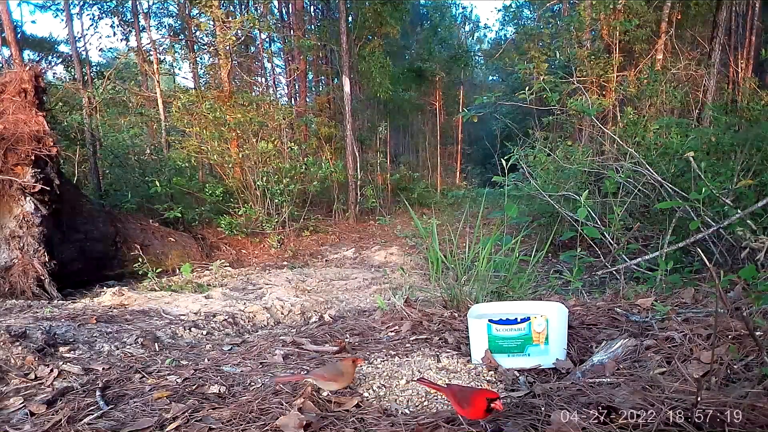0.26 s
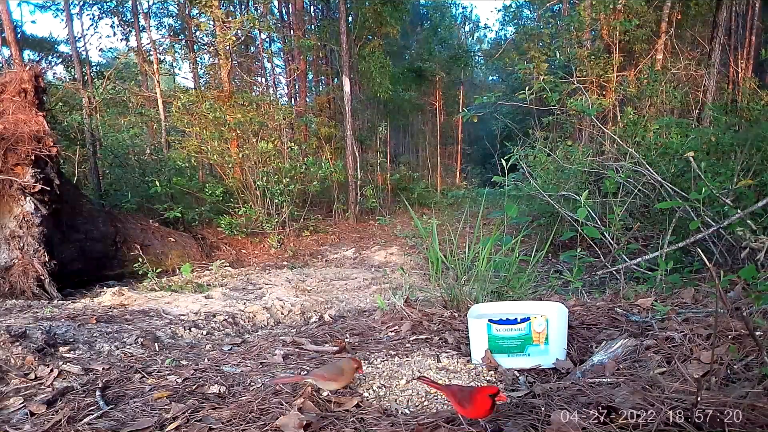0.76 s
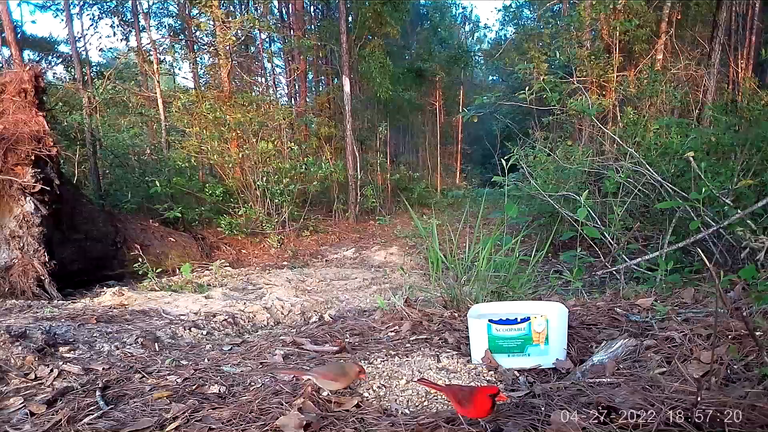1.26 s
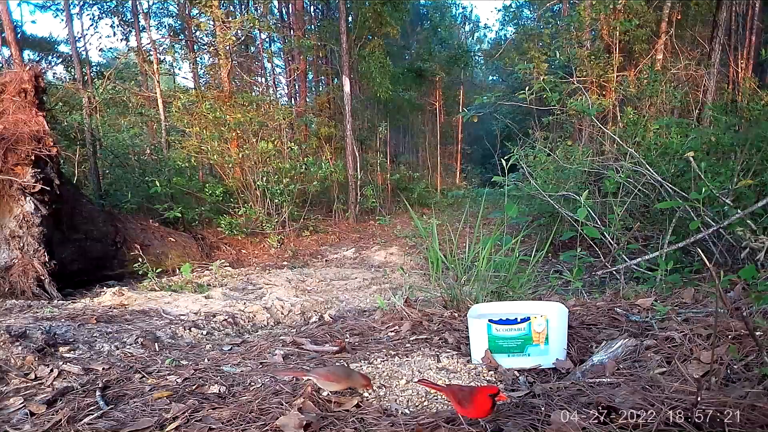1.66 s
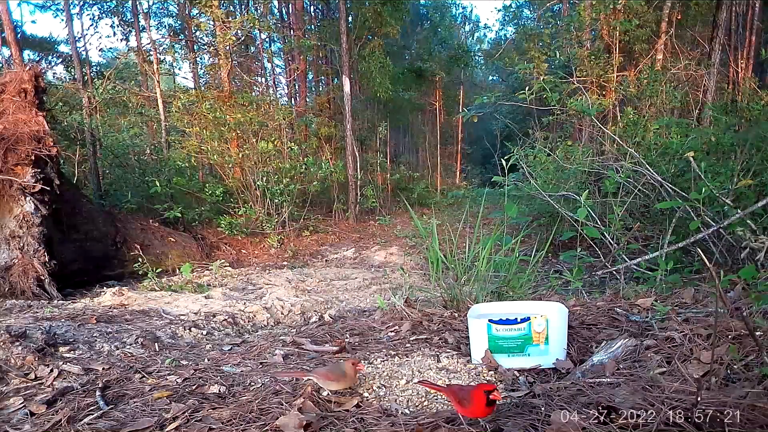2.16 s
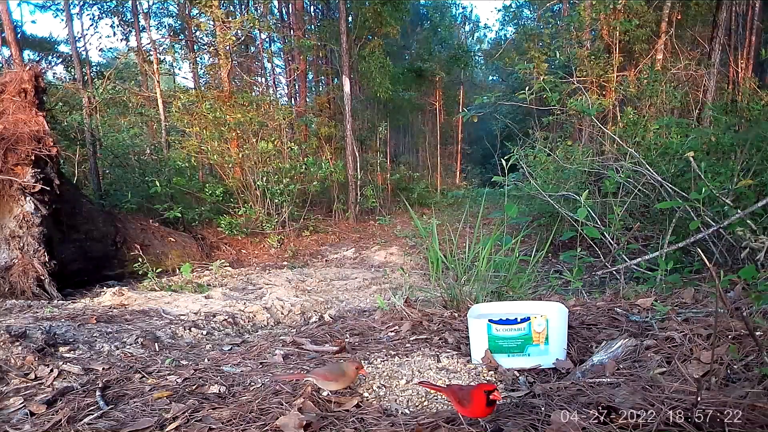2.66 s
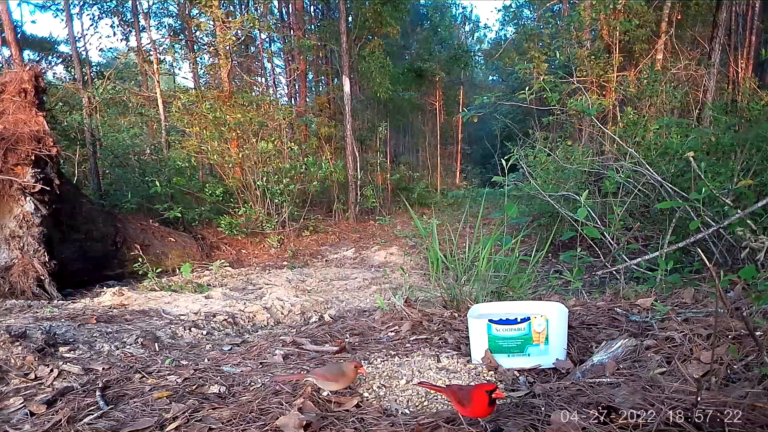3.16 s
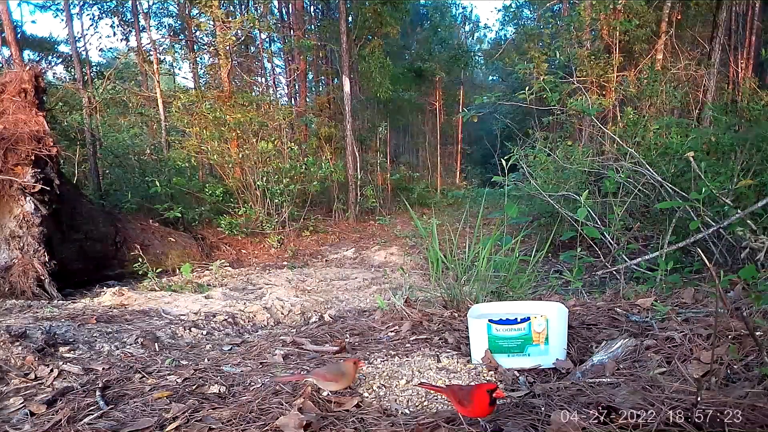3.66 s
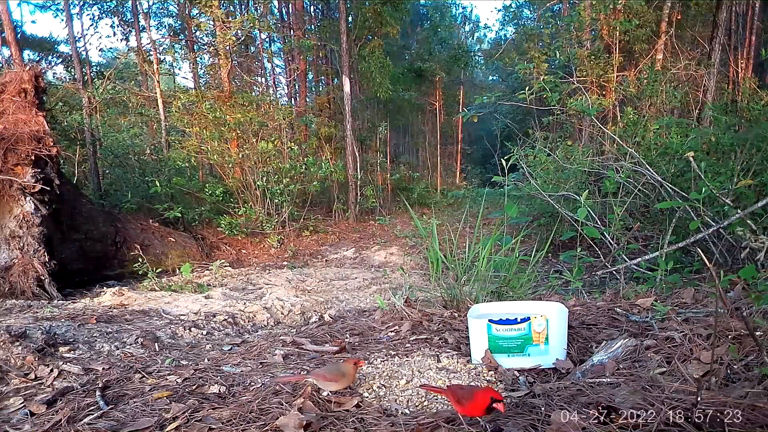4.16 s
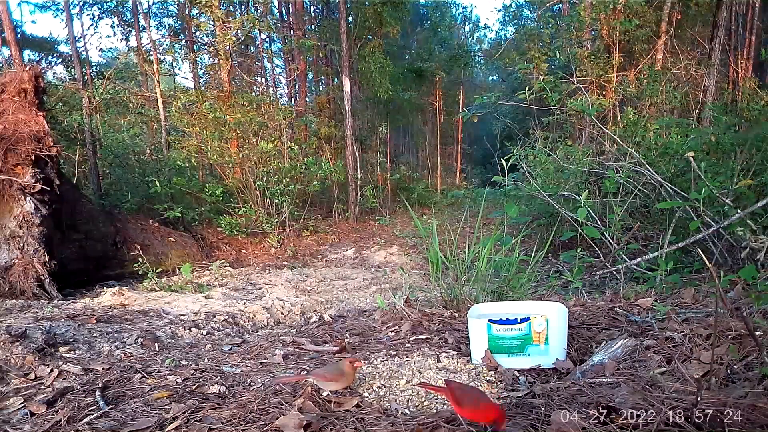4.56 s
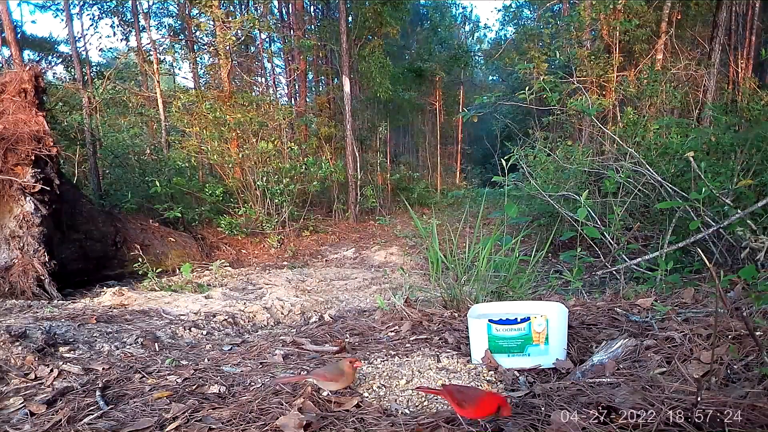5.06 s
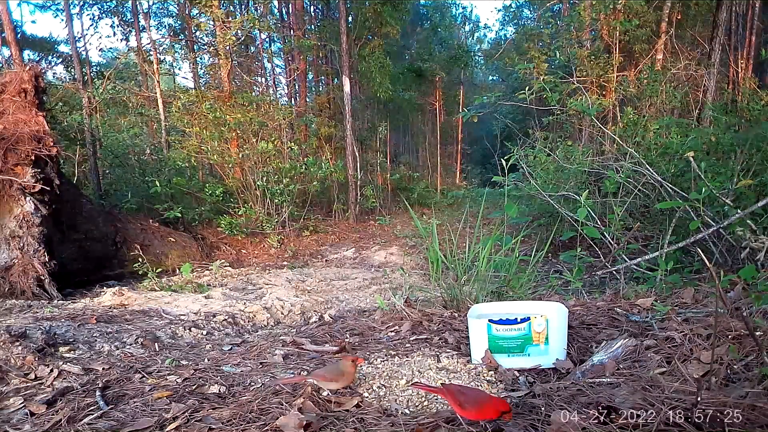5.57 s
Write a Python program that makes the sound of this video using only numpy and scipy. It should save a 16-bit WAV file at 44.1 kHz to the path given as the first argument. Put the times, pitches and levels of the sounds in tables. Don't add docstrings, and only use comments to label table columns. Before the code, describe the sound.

At a woodland clearing, a close cricket gives four fast, high trills over a continuous pulsing chorus of distant insects. Two birds crack seeds nearby: one sharp snap early, two very loud ones around two seconds, then many tiny ticks. Faint far bird whistles appear. The small mono camera microphone adds hiss, low hum and a thin electronic whine.

```python
import sys
import numpy as np
from scipy import signal
from scipy.fft import rfft, irfft
from scipy.io import wavfile

SR = 44100
rng = np.random.default_rng(int(sys.argv[2]) if len(sys.argv) > 2 else 0)


def attenuation_scalar(level_db):
    decades = np.asarray(level_db, float) / 20
    return 10 ** decades


def generate_wav(sig):
    pcm = np.round(np.clip(np.atleast_2d(sig).T, -1, 1) * 32767).astype(np.int16)
    wavfile.write(sys.argv[1], SR, pcm)


N = 256662
TIME_S = np.arange(N) / SR

# first full pulse t/s, pulse count, full level/dB
TRILLS = [
    (.1049, 35, -31.5),
    (1.7785, 39, -31.3),
    (3.3723, 40, -30),
    (5.0937, 36, -30.3),
]
# t/s, peak level/dB, low ring/dB, top ring/dB, deep ring/dB
CRACKS = [(.8303, -9, -6, -9, -26), (2.0651, 1.5, -20, -31, -42), (2.4904, 2.5, -23, -16, -35),
          (1.3783, -28, -4, -18, -26), (1.6526, -32, -14, -18, -26), (3.0147, -31, 2, -20, -16),
          (3.0524, -34, -14, -10, -7), (3.06, -27, 1, -20, -26), (3.097, -31, -18, -22, -26),
          (3.6147, -27, -2, -2, -30), (4.0004, -35, -12, -16, -26), (4.2063, -33, -8, -16, -26),
          (4.4834, -38, 0, -18, -26), (4.5984, -39, 0, -18, -26), (4.9312, -33, -10, -20, -26)]
# peak level/dB, low ring/dB, top ring/dB, deep ring/dB
NIBBLE_DB = (-36, -1, -20, -8)
# f/Hz, level/dB, t60/s
HUSK_MODES = [(2710, -4, 0.0058), (4300, -1, 0.005), (6100, -1.5, 0.0054), (6840, -3, .004),
              (7950, -2, 0.004), (9150, 1, 0.0032), (10700, 0, 0.0024), (11500, -2, 0.0021),
              (13700, -1, 0.0022), (15600, -7, 0.0022)]
HUSK_FAMILY = (3, 3, 1, 3, 1, 1, 0, 0, 2, 2)
# lag t/s, level/dB
ECHOES = [(.0016, -25), (.00212, -24), (.0027, -24), (.00311, -23), (.0055, -34), (.0072, -40),
          (.0093, -39)]
# pulse rate f/Hz, pulse depth 0-1, pitch wander f/Hz, level/dB
SINGERS = [(55.3, 0.55, 8.28, -48), (61.877, 0.65, 13.6, -50.5), (57, 1, 11.65, -53),
           (50.668, 0.6, 22.2, -66), (66.3, 0.53, 24.0, -58.5), (71.7, 0.92, 12.131, -48),
           (76.7, 0.77, 11.5, -50), (44.9, 1, 12.96, -50.5)]
SINGER_HZ = (5551, 5357, 5495, 4943, 5097, 5675, 5743, 6240)
SINGER_GROUP = (0, 0, 0, 0, 0, 1, 1, 2)
# f/Hz, width f/Hz, level/dB
INSECT_MASS = [(5553, 410, -45), (5210, 650, -54), (6020, 1270, -47), (8010, 630, -56.5)]
# first start t/s, period t/s, length t/s, fade t/s
MIDDLE_BOUTS = (-.95, 2.23, 1.05, .08)
# first start t/s, period t/s, length t/s, fade t/s
HIGH_BOUTS = (-1.0, 1.88, 1.15, .25)
# start t/s, length t/s, f/Hz, level/dB
WHISTLES = [
    (0.378, 0.12634, 2530, -48),
    (.505, 0.08, 2520, -55),
    (2.256, 0.13, 2530, -50.5),
    (2.375, .09, 2520, -54),
    (2.635, .04, 2525, -52),
]
CURRENT_STEPS = [(.12, -.35, .05), (.305, -1.0, .062), (.53, .22, .05), (.69, 1.15, .066)]
# start t/s, end t/s
BUSY_SPELLS = [
    (.31, 1.49),
    (3.215, 4.665),
]
# f/Hz, level/dB per Hz
HISS = [(8, -76.5), (70, -72.5), (200, -71.5), (400, -76), (1500, -83.5), (4500, -86.5), (14500, -87.5),
        (16000, -85.5)]
# t/s, length t/s, loss level/dB
DROPOUTS = [
    (2.572, .02, -20),
    (2.657, .02, -18),
    (5.772, .024, -18),
]


def near_cricket():
    stroke_s, full_len_s, first_share = .020176, 0.007289, 0.66
    wing_hz, glide_hz_per_s, skew = 6790, 25000, 0.78
    near_db, lead_db = 8, -1
    start_below_db, build_s, start_flat_hz = 13, 0.26, 45
    out = np.zeros(N + SR)
    for start_s, count, full_db in TRILLS:
        progress = np.linspace(0, 1, count + 1)
        lengths_s = full_len_s * (first_share + (1 - first_share) * np.sqrt(progress))
        starts_s = start_s + stroke_s * np.arange(-1, count) + rng.normal(0, 0.00022, count + 1)
        starts_s += .5 * (full_len_s - lengths_s)
        starts_s[0] -= .0016
        level_db = full_db + near_db - start_below_db * np.exp((start_s - starts_s) / build_s)
        level_db += rng.normal(0, 1.0, count + 1)
        level_db += 10 * np.log10(full_len_s / lengths_s)
        level_db[0] += lead_db
        slips_rad = np.cumsum(np.cumsum(rng.normal(0, .7, count + 1)))
        flats_hz = start_flat_hz * (1 - progress)
        for s, length_s, db, slip_rad, flat_hz in zip(starts_s, lengths_s, level_db, slips_rad, flats_hz):
            i = int(s * SR)
            u = np.linspace(0, 1, int(length_s * SR))
            pitch_hz = wing_hz - flat_hz + glide_hz_per_s * (.0035 - u * length_s)
            phase = 2 * np.pi * (np.cumsum(pitch_hz) + wing_hz * i) / SR
            swell = np.sin(np.pi * u ** skew) ** 0.982
            out[i:i + len(u)] += attenuation_scalar(db) * swell * np.sin(phase + slip_rad)
    out = out[:N]
    return out + attenuation_scalar(-23.5) * np.roll(out, 260)


def seeds():
    start_s, gap_s, count = 4.504, .0034, 8
    nibbles = [(start_s + gap_s * (k + rng.uniform(-.4, .4)), *NIBBLE_DB) for k in range(count)]
    table = np.array([*CRACKS, *nibbles])
    at = (table[:, 0] * SR).astype(int)
    tilts_db = (0, table[:, 2], table[:, 3], table[:, 4])
    out = np.zeros(N)
    for (hz, db, t60_s), family in zip(HUSK_MODES, HUSK_FAMILY):
        clicks = np.zeros(N + 40)
        size = attenuation_scalar(table[:, 1] + db + tilts_db[family] + rng.normal(0, 0.93, len(at)))
        for cycles, share in ((0, 1), (1, .5), (3, .5)):
            clicks[at + round(cycles * SR / hz)] += share * size
        narrow = signal.butter(1, [0.82 * hz, 1.25 * hz], "band", fs=SR, output="sos")
        out += signal.sosfilt(narrow, ring(clicks[:N], hz, t60_s))
    top_band = signal.butter(2, [9500, 12800], "band", fs=SR, output="sos")
    bright = signal.sosfilt(top_band, out)
    return out + sum(attenuation_scalar(db) * np.roll(bright, int(lag_s * SR)) for lag_s, db in ECHOES)


def chorus():
    rest_db, lift_db = (0.83, -3.0, -4.5), (3, 7.5, 6.0)
    singing = bouts(*MIDDLE_BOUTS), bouts(*MIDDLE_BOUTS), bouts(*HIGH_BOUTS)
    swell_db = [rest + lift * on for rest, lift, on in zip(rest_db, lift_db, singing)]
    out = np.zeros(N)
    for hz, group, (rate_hz, depth, wander_hz, db) in zip(SINGER_HZ, SINGER_GROUP, SINGERS):
        beat = np.cos(2 * np.pi * np.cumsum(rate_hz + 0.77 * drift(1.47)) / SR)
        pulses = 1 - depth + depth * np.maximum(beat + 0.42, 0)
        level = attenuation_scalar(db + swell_db[group] + 1.74 * drift(17.59))
        out += level * pulses * tone(hz + wander_hz * drift(13.8))
    for (hz, width_hz, db), follow in zip(INSECT_MASS, (0.75, 0.6696, 0.2847, 0.06)):
        band = coloured(lambda f: 1 / (1 + ((f - hz) / (width_hz / 2)) ** 4) / np.sqrt(width_hz))
        out += attenuation_scalar(db + follow * swell_db[0]) * band
    return out


def far_bird():
    out = np.zeros(N)
    for start_s, length_s, hz, db in WHISTLES:
        u = np.clip((TIME_S - start_s) / length_s, 0, 1)
        out += attenuation_scalar(db) * np.sqrt(np.sin(np.pi * u).clip(0)) * tone(hz + 15 * (.5 - u))
    return out


def electronics():
    frame_hz, hiss_top_hz, offset = 29.97, 16050, -.0073
    idle_hz, pull_hz_per_vs, idle_db = 1774.5, 20010000, -47
    load_db, busy_lift_db, switch_s = -42.5, 7.0, .06
    hz, db = np.transpose(HISS)
    hiss = coloured(lambda f: attenuation_scalar(np.interp(np.log(f), np.log(hz), db)) * (f < hiss_top_hz))
    place = TIME_S * frame_hz
    hum = np.zeros(N)
    for at, size, width in CURRENT_STEPS:
        away = (place - at + .5) % 1 - .5
        hum += size * np.exp(-.5 * (away / width) ** 2)
    busy = sum(gate(TIME_S - start_s, end_s - start_s, switch_s) for start_s, end_s in BUSY_SPELLS)
    hum = (hum - hum.mean()) * attenuation_scalar(load_db + 2.5 + busy_lift_db * busy)
    hum += attenuation_scalar(-64) * np.cos(8 * np.pi * (place + .066))
    quick = signal.sosfilt(signal.butter(2, 24, "high", fs=SR, output="sos"), hiss)
    leak = np.exp(-2 * np.pi * 5 / SR)
    sag_vs = signal.lfilter([1 / SR], [1, -leak], hum + 1.05 * quick)
    whistle = attenuation_scalar(idle_db) * tone(idle_hz - pull_hz_per_vs * sag_vs)
    return thinned(hiss) + hum + whistle + offset


def thinned(x):
    loss_db = np.zeros(N)
    for mid_s, length_s, db in DROPOUTS:
        loss_db += db * np.cos(np.pi * np.clip((TIME_S - mid_s) / length_s, -.5, .5)) ** 2
    low = signal.sosfiltfilt(signal.butter(4, 1500, fs=SR, output="sos"), x)
    return low + attenuation_scalar(loss_db) * (x - low)


def drift(rate_hz):
    r = np.exp(-2 * np.pi * rate_hz / SR)
    slow = signal.lfilter([1], [1, -2 * r, r * r], rng.standard_normal(N + SR))[SR:]
    return slow / slow.std()


def tone(hz):
    return np.sqrt(2) * np.sin(2 * np.pi * np.cumsum(hz) / SR)


def ring(clicks, hz, t60_s):
    r = attenuation_scalar(-60 / (t60_s * SR))
    w = 2 * np.pi * hz / SR
    return signal.lfilter([0, np.sin(w)], [1, -2 * r * np.cos(w), r * r], clicks + 1e-18)


def coloured(gain_at):
    hz = np.maximum(np.fft.rfftfreq(N, 1 / SR), 1)
    return irfft(rfft(rng.standard_normal(N)) * gain_at(hz), N) * np.sqrt(SR / 2)


def gate(since_s, length_s, fade_s):
    return np.clip(.5 + np.minimum(since_s, length_s - since_s) / fade_s, 0, 1)


def bouts(start_s, period_s, length_s, fade_s):
    return gate((TIME_S - start_s + fade_s) % period_s - fade_s, length_s, fade_s)


def scene():
    mono = near_cricket() + seeds() + chorus() + far_bird() + electronics()
    return np.stack([mono, mono])


def band_limit(x):
    return signal.sosfilt(signal.butter(12, 16680, fs=SR, output="sos"), x)


def record(dry):
    top = signal.cheby2(10, 60, 16900, fs=SR, output="sos")
    mix = np.clip(signal.sosfilt(top, dry), -1, 1)
    return band_limit(mix)


dry = scene()
out = record(dry)
generate_wav(out)
```